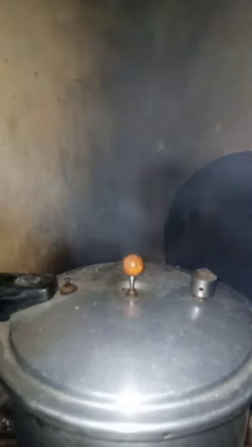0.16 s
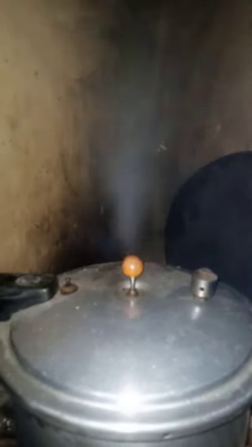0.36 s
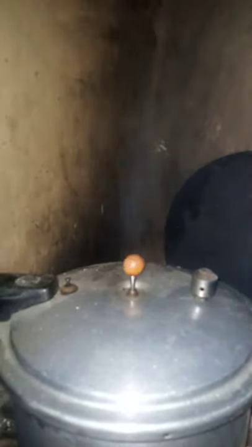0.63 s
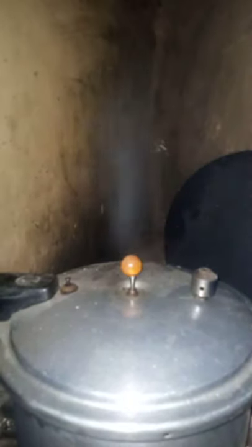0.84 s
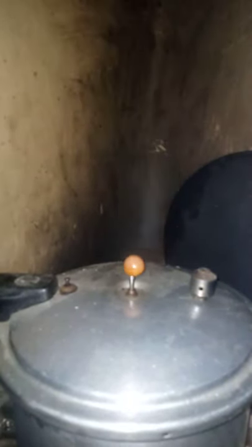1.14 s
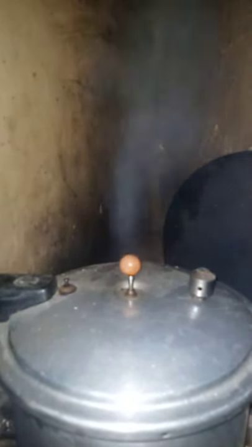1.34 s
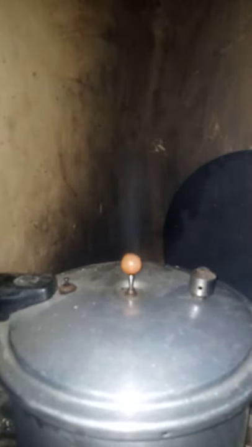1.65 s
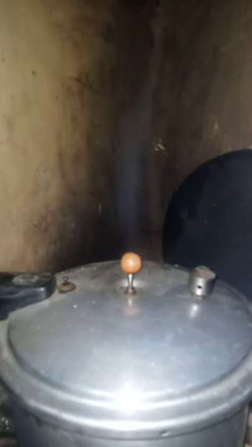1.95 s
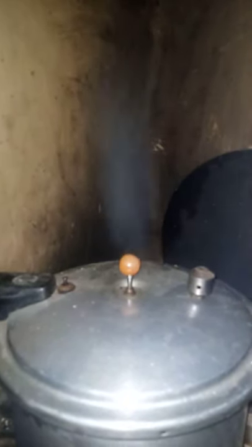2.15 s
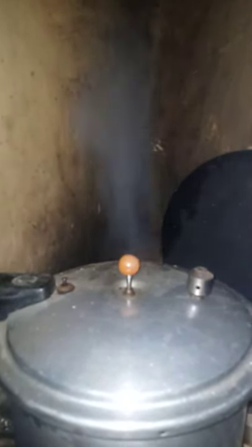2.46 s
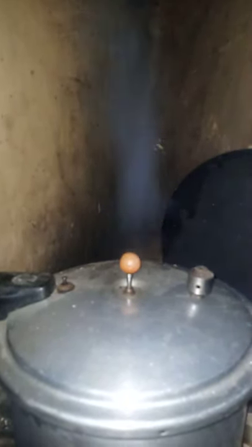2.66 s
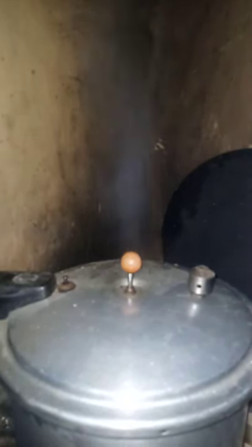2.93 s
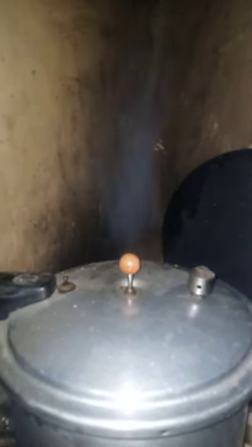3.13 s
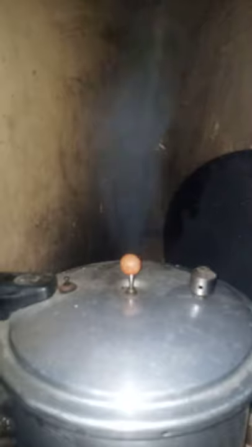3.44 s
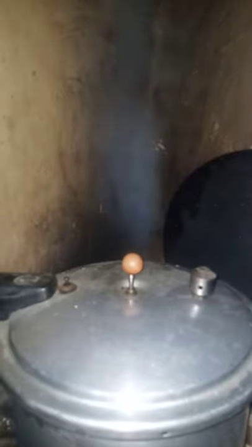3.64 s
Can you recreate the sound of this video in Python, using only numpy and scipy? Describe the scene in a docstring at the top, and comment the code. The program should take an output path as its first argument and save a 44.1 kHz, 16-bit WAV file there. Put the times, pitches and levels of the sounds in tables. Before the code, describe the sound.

Steam hisses from a pressure cooker vent for the whole 3.8 seconds, bright and sizzling with a slight metallic ring. It flutters unevenly about fourteen times a second, with deeper chokes near 0.4 and 0.73, and swells around 0.1, 0.9 and 1.4. Faint gurgling and lumpy rumble lie beneath; soft microphone thumps cluster at 0.5-0.9, strongest near 0.8. Close phone, small kitchen, short tail.

```python
"""Steam hisses from a pressure cooker's vent, close to a hand-held phone in a small kitchen: shaped noise.
The weight on the vent rocks about fourteen times a second and chokes the jet, often with a lighter second touch.
The hiss rings in the lid and the pot, and a short room tail fills the gaps.
Under it lie a faint gurgle of patchy low noise, a lumpy rumble and soft low thumps of sagging pitch,
the last two from the hand and the air at the microphone."""
import sys
import numpy as np
from scipy import signal
from scipy.fft import rfft, irfft
from scipy.io import wavfile
from scipy.ndimage import uniform_filter1d

SR = 44100
rng = np.random.default_rng(int(sys.argv[2]) if len(sys.argv) > 2 else 0)


def ratio_of_db(decibels):
    """Turn decibels (scalar or array-like) into linear amplitude factors; 0 dB maps to 1."""
    return 10 ** (np.asarray(decibels, float) / 20)


def bounce(signal):
    """Save signal as a 16-bit WAV file at the path given by the first command-line argument."""
    frames = np.transpose(np.atleast_2d(signal))
    limited = np.clip(frames, -1, 1)
    pcm = np.round(limited * 32767).astype(np.int16)
    wavfile.write(sys.argv[1], SR, pcm)


N = 167139  # samples, about 3.8 s


def evened(x):
    """Scales to rms 1."""
    return x / np.sqrt(np.mean(abs(x) ** 2) + 1e-20)


def read(f, value, hz):
    """Reads a curve on a log-frequency axis."""
    return np.interp(np.log(hz + 1), np.log(np.asarray(f) + 1.), value)


def colour(x, gain):
    """Filters by a gain given as a function of Hz."""
    hz = np.fft.rfftfreq(len(x), 1 / SR)
    return irfft(rfft(x) * gain(hz), len(x))


def blurred(shape, frames, bins):
    """Random field of rms 1, smooth over so many frames and bins; returned as bins by frames."""
    field = uniform_filter1d(rng.standard_normal(shape), frames, axis=0)
    return evened(uniform_filter1d(field, bins, axis=1)).T


def noise_cells(frames, bins):
    """Complex white noise, one value per bin and frame."""
    a, b = rng.standard_normal((frames, bins, 2)).T
    return a + 1j * b


REOPEN = .85  # the dip is narrowed by this after its centre and widened by its inverse before

# Touches of the rocking weight on the vent.
# Each row: centre in seconds, depth in dB, nominal width at half depth in ms.
CHOKES = [(0.055, 6.5, 30), (0.138, 8.5, 22), (0.256, 5.5, 35), (0.333, 6.5, 27), (0.416, 18, 9.1),
          (0.481, 16, 11.7), (0.594, 6, 39), (0.653, 10, 16), (0.729, 26, 7.9), (0.753, 7, 19),
          (0.822, 5, 18), (0.903, 16, 10.4), (0.97, 10, 14), (1.054, 10.5, 17.0), (1.113, 6, 20),
          (1.201, 6, 16), (1.261, 11, 9.2), (1.337, 7.5, 42), (1.443, 13.5, 12), (1.511, 15, 17),
          (1.552, 4.5, 8.6), (1.584, 6, 23), (1.648, 8.5, 22), (1.715, 9, 21), (1.786, 11.5, 17),
          (1.856, 9.5, 20), (1.928, 12, 13), (2.002, 15.5, 13), (2.069, 7.5, 16), (2.142, 11, 15),
          (2.208, 13.5, 13.5), (2.254, 6, 7.7), (2.284, 10.5, 19), (2.351, 10.5, 15), (2.426, 11, 18),
          (2.494, 7, 13), (2.537, 8, 7.7), (2.57, 10.5, 17), (2.634, 5, 38), (2.707, 10, 20),
          (2.779, 9.5, 19), (2.85, 8, 31), (2.919, 9, 23), (2.963, 4.5, 18), (2.996, 17, 13),
          (3.063, 11, 22), (3.107, 7, 12), (3.142, 11.5, 18), (3.209, 11, 17), (3.285, 14, 15.5),
          (3.316, 8, 5.9), (3.352, 9, 23), (3.394, 7, 8.1), (3.427, 12, 13.5), (3.491, 8, 23.0),
          (3.536, 7, 9.8), (3.569, 7.5, 22), (3.636, 7, 24), (3.677, 2.5, 8.5), (3.71, 7, 22),
          (3.779, 11, 17)]


def choke_db(t):
    """Level lost while the weight leans on the vent: one bell-shaped dip per touch, quicker to reopen."""
    lost = np.zeros(len(t))
    for s, depth_db, width_ms in CHOKES:
        spread = width_ms / 2355 * np.where(t > s, REOPEN, 1 / REOPEN)  # half-depth width to sigma in s
        lost += depth_db * np.exp(-.5 * ((t - s) / spread) ** 2)
    return lost


RIPPLE_DB, RIPPLE_WIDTH_HZ, RIPPLE_FROM_HZ = 1.4, 60, 2600  # uneven treble, for echoes off the near wall

# Relative spectrum of the jet close to the vent. Each row: frequency in Hz, density in dB per Hz.
HISS = [(700, -50), (840, -37), (930, -27), (1390, -25.5), (2380, -25), (3140, -21.5), (3360, -17),
        (4300, -10.5), (5200, -11.5), (6100, -15), (7450, -9), (8300, -13.5), (9100, -19.5), (10200, -13.5),
        (11300, -11.5), (13000, -18)]
# Top of the hiss, lifted by the microphone port. Each row: frequency in Hz, relative density in dB per Hz.
SIZZLE = [(13850, -14), (14550, -1), (15000, 0), (15700, -2)]
# Resonances and one notch of lid and pot. Each row: frequency in Hz, width in Hz, lift in dB.
RINGS = [(1240, 40, 5), (1470, 70, 5), (1690, 60, 6), (1850, 90, 4), (1960, 110, 6), (2400, 80, -4.5),
         (6630, 127, 6)]


def body(hz):
    """Gain of the jet's spectrum with the rings of the metal and a random ripple in the treble."""
    lift_db = sum(db / (1 + (2 * (hz - f) / width) ** 2) for f, width, db in RINGS)
    ripple_bins = round(RIPPLE_WIDTH_HZ / hz[1])
    ripple = evened(uniform_filter1d(rng.standard_normal(len(hz)), ripple_bins))
    lift_db += RIPPLE_DB * ripple * (hz > RIPPLE_FROM_HZ)
    return ratio_of_db(read(*np.transpose(HISS + SIZZLE), hz) + lift_db)


def kitchen(field_db):
    """The small room adds a short dying tail to the power at every pitch."""
    room_db, room_t60_s = -10.5, 0.28
    keep = ratio_of_db(-120 * 32 / SR / room_t60_s)  # share of the power left after a 32-sample frame
    power = ratio_of_db(2 * field_db)
    tail = signal.lfilter([1 - keep], [1, -keep], power)
    return 10 * np.log10(power + ratio_of_db(2 * room_db) * tail)


CHOKE_SCATTER = .17  # how unevenly a choke bites across pitch and time, rms share
PATCH_DB, FLICKER_DB = 0.89, 0.93  # rms of slow and of quicker level changes
SPIT_DB = 1  # rms at 15 kHz of the quickest level changes

# The jet at the vent; its swell is strongest in the body and weaker in the treble.
# Each row: time in seconds, level in dB, swell in dB before its share.
JET = [(0, -29, 6.5), (.1, -23, 1), (0.191, -30.5, 9.5), (.26, -24.5, 0.5), (.4, -27.5, 4), (.6, -28, 4),
       (.9, -24.5, -1), (1.15, -26.5, 3), (1.4, -23, -0.5), (1.7, -26.5, 2), (2.2, -28, 2.5),
       (3.2, -26.5, 1), (3.79, -27.5, 2)]
# How each region follows the weight on the vent and the swell of the jet.
# Each row: frequency in Hz, share of the choke, lag in ms (below 0 is early), share of the swell.
FOLLOW = [(1480, 0.85, 4, 1.4), (4560, 0.58, 2.5, 0.98), (7600, 0.85, 2.2, 1.09), (11000, 1.03, -.4, 0.66),
          (15600, 1.02, -2.5, 0.72)]


def steam():
    """Turbulent noise set by pressure, chokes, patches and a spitting that grows with pitch."""
    frames, hz = N // 32 + 8, np.fft.rfftfreq(128, 1 / SR)
    t = np.arange(frames) * 32 / SR
    shape = (frames, len(hz))
    s, level_db, swell_db = np.transpose(JET)
    f, choke_share, lag_ms, swell_share = np.transpose(FOLLOW)

    lost = choke_db(t)
    late = np.array([np.interp(t - lag / 1000, t, lost) for lag in read(f, lag_ms, hz)])
    late *= np.maximum(1 + CHOKE_SCATTER * blurred(shape, frames=60, bins=6), 0)

    field_db = np.interp(t, s, level_db) - read(f, choke_share, hz)[:, None] * late
    field_db += read(f, swell_share, hz)[:, None] * np.interp(t, s, swell_db)
    field_db += PATCH_DB * blurred(shape, frames=50, bins=4)
    field_db += FLICKER_DB * blurred(shape, frames=12, bins=20)
    field_db += SPIT_DB * blurred(shape, frames=3, bins=12) * hz[:, None] / 15000
    field_db = kitchen(field_db)

    cells = noise_cells(frames, len(hz)) * ratio_of_db(field_db)
    raw = signal.istft(cells, nperseg=128, noverlap=96)[1][:N]
    jet = colour(raw, body)
    return evened(jet) * np.sqrt(np.mean(ratio_of_db(2 * field_db)))


GURGLE_DB, GURGLE_PATCH_DB = -69.5, 5.5  # rms level, rms of the patches
GURGLE_FOLLOW = 1.18  # share of the jet's swell that the gurgle follows

# Relative spectrum of the water in the pot. Each row: frequency in Hz, density in dB per Hz.
GURGLE = [(180, -32), (260, -5.5), (430, -1), (600, 2), (760, -4), (1000, -12), (1300, -33)]


def gurgle():
    """Water in the pot: low noise that comes and goes in small patches of pitch and time."""
    frames, hz = N // 128 + 8, np.fft.rfftfreq(512, 1 / SR)
    t = np.arange(frames) * 128 / SR
    patches = blurred((frames, len(hz)), frames=14, bins=2)
    s, _, swell_db = np.transpose(JET)
    swell_db = np.interp(t, s, swell_db)
    cells = noise_cells(frames, len(hz)) * ratio_of_db(GURGLE_PATCH_DB * patches + GURGLE_FOLLOW * swell_db)
    raw = signal.istft(cells, nperseg=512, noverlap=384)[1][:N]
    low = colour(raw, lambda f: ratio_of_db(read(*np.transpose(GURGLE), f)))
    return ratio_of_db(GURGLE_DB) * evened(low)


RUMBLE_DB = -67  # rms level
LUMPS_PER_S, LUMP_DB, LUMP_S = 25, 7, 0.023  # mean rate, greatest lift, decay time constant

# Relative spectrum of hand and air at the microphone. Each row: frequency in Hz, density in dB per Hz.
RUMBLE = [(25, 1.5), (65, -4), (115, 3.5), (230, -6.5), (420, -42)]


def rumble():
    """Low noise lifted in short dying lumps of random time and size."""
    kicks = (rng.random(N) < LUMPS_PER_S / SR) * rng.exponential(1, N)
    decay = np.exp(-np.arange(SR // 5) / SR / LUMP_S)
    lumps = signal.fftconvolve(kicks, decay)[:N]
    low = colour(rng.standard_normal(N), lambda hz: ratio_of_db(read(*np.transpose(RUMBLE), hz)))
    return ratio_of_db(RUMBLE_DB) * evened(low * ratio_of_db(LUMP_DB * np.minimum(lumps, 1)))


THUMP_HZ, SAG_S, THUMP_T60_S = 184, .008, 0.051  # starting pitch, time in which it halves, decay time
EDGE_HZ, EDGE_DB = 660, -63.5  # knock pitch, and its gain at a thump of -41.5 dB
EDGE_GROWTH = 2.2  # dB of knock per dB of thump

# Thumps at the microphone. Each row: start in seconds, peak of the swing in dB, rise time constant in ms.
THUMPS = [(.1475, -48.5, 1.2), (0.529, -48, 1), (0.545, -41, 0.45), (.738, -45, 7.4), (0.7966, -37.5, 1.8),
          (.821, -51, 0.65), (0.944, -51, 5), (1.372, -52, 5), (1.967, -49, 3), (2.092, -51.5, 2),
          (3.113, -60, 5.4)]


def thumps():
    """Each thump: a pull and a swing back whose pitch sags as it dies; hard ones carry a brief knock."""
    t, out = np.arange(SR // 10) / SR, np.zeros(N + SR)
    turns = THUMP_HZ * SAG_S * np.log(1 + t / SAG_S)
    ringing = -np.sin(2 * np.pi * turns) * ratio_of_db(-60 * t / THUMP_T60_S)
    u = t * EDGE_HZ * 2 * np.pi
    knock = np.sin(u) * u * np.exp(1 - u / 4)
    for s, peak_db, rise_ms in THUMPS:
        swing = ringing * (1 - np.exp(-1000 * t / rise_ms)) ** 2
        knock_db = EDGE_DB + EDGE_GROWTH * (peak_db + 41.5)
        thump = ratio_of_db(peak_db) * swing / abs(swing).max() + ratio_of_db(knock_db) * knock
        out[round(s * SR):][:len(t)] += thump
    return out[:N]


def scene():
    """One microphone, heard alike on both channels."""
    return np.tile(steam() + gurgle() + rumble() + thumps(), (2, 1))


def roll_off(x):
    """The treble ends steeply here."""
    return signal.sosfilt(signal.butter(12, 15830, fs=SR, output="sos"), x)


def record(dry):
    """Bass cut and steep upper band limit of the phone."""
    mic_low_hz, mic_top_hz = 53.3, 15730
    bass_cut = signal.butter(2, mic_low_hz, "high", fs=SR, output="sos")
    band_limit = signal.firwin(767, mic_top_hz, window=("kaiser", 10), fs=SR)
    cut = signal.sosfilt(bass_cut, dry)
    mix = signal.oaconvolve(cut, band_limit[None], "same")
    return roll_off(mix)


dry = scene()
out = record(dry)
bounce(out)
```